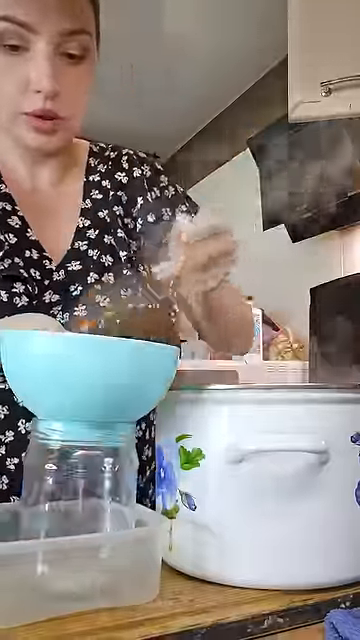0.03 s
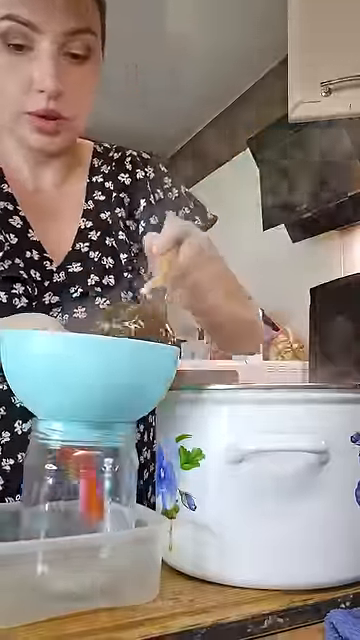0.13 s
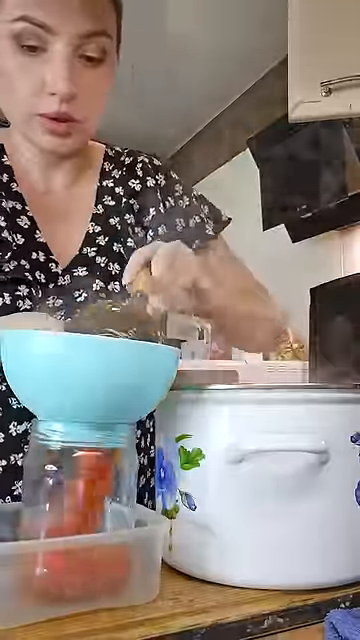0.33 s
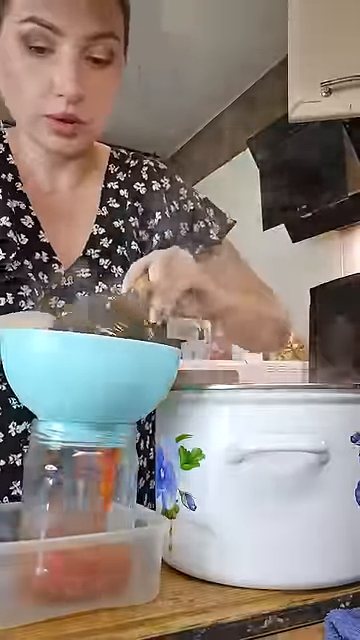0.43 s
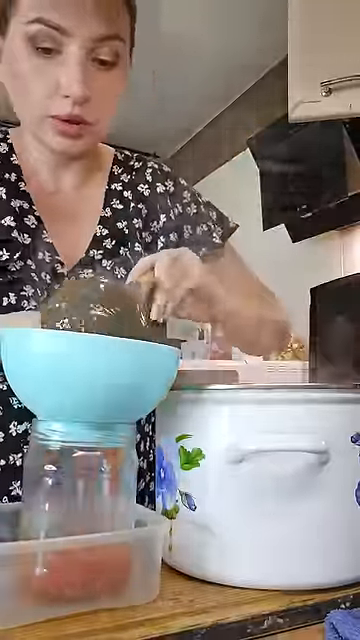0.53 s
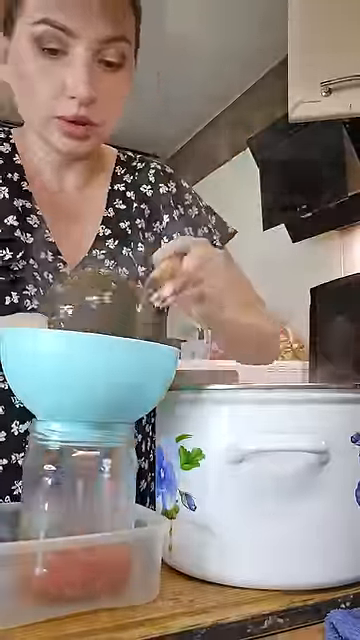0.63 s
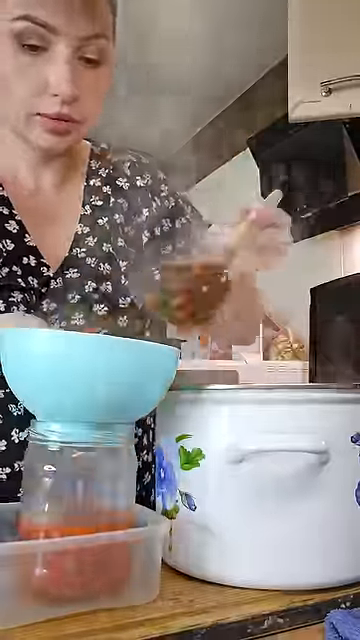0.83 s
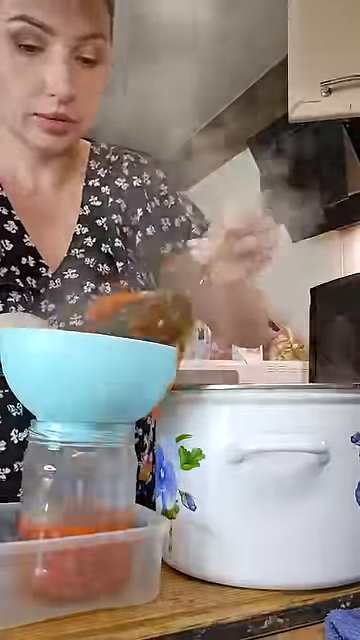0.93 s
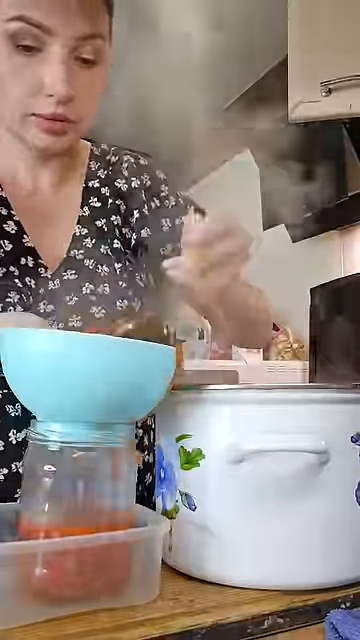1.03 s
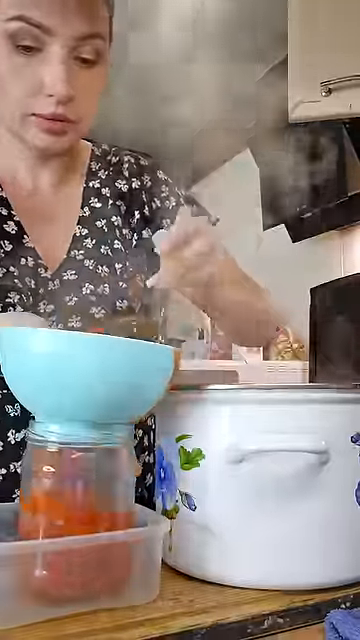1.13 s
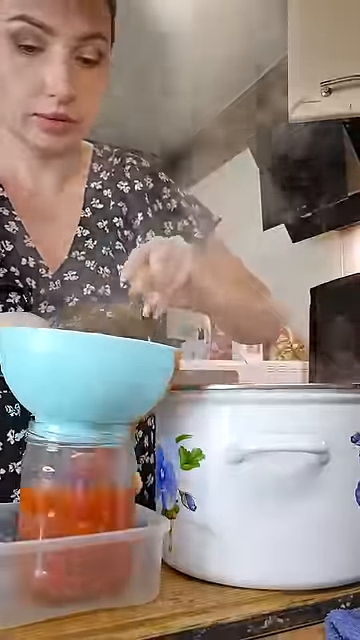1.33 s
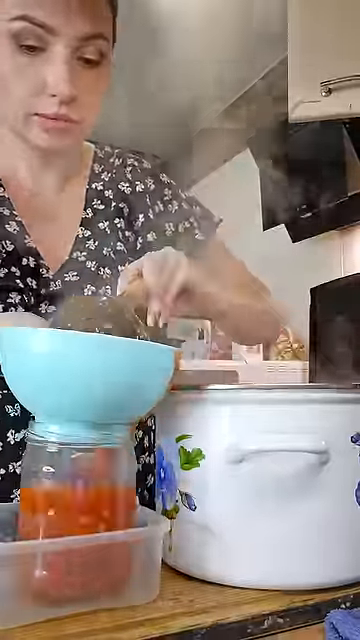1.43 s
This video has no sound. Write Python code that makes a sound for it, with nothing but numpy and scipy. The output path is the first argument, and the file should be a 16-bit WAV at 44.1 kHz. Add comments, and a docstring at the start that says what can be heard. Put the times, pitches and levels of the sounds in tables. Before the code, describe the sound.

Thick sauce ladled through a plastic funnel into a glass jar: bright ticks and funnel knocks, a hollow plop, small drips, then a denser burst of knocks and plops, close up in a small kitchen with a low drone.

```python
"""An appliance drone of filtered noise lies under a small kitchen all the way; grains and a wet band trickle.
First, ladle ticks and funnel knocks (rattle-driven modes) lead to a plop (a swelling, rising sine) in the jar.
Two drips (clear sines) follow and the blows thin out; a denser burst of blows and plops comes past 1.1 s.
Ticks and drips close it. Thick sauce is being ladled through a plastic funnel into a glass jar."""
import sys
import numpy as np
from scipy import signal
from scipy.io import wavfile

SR = 44100
rng = np.random.default_rng(int(sys.argv[2]) if len(sys.argv) > 2 else 0)


def int16_out(signal):
    """Quantize to a 16-bit WAV file."""
    q = np.round(np.clip(np.atleast_2d(signal).T, -1, 1) * 32767)
    wavfile.write(sys.argv[1], SR, q.astype(np.int16))


def volts(x):
    """Linear amplitude factor 10**(x/20) for a level x in dB, scalar or array-like."""
    e = np.asarray(x, float) / 20
    return 10 ** e


N = 66150


def rms_one(x):
    """Scale to rms 1."""
    return x / np.sqrt(np.mean(x ** 2) + 1e-20)


def peak_one(x):
    """Scale to peak 1."""
    return x / np.abs(x).max()


def in_time(rows):
    """Join curve rows by straight lines, one value per sample."""
    s, *columns = np.transpose(rows)
    return [np.interp(np.arange(N) / SR, s, c) for c in columns]


def at_hz(points, hz):
    """Read a curve over a log frequency axis."""
    f, value = np.transpose(points)
    return np.interp(np.log(hz), np.log(f), value)


def drift(rate_hz):
    """Slow random curve of rms 1: noise through two equal low-pass poles."""
    step = 40  # samples per drift point
    r = np.exp(-2 * np.pi * step * rate_hz / SR)
    noise = rng.standard_normal(N // step + 2002)
    slow = signal.lfilter([1], [1, -2 * r, r * r], noise)[2000:]
    return np.interp(np.arange(N) / step, np.arange(len(slow)), rms_one(slow))


def ring(x, hz, t60_s):
    """Two-pole mode: a unit click sets a decaying sine of height 1 ringing."""
    r, w = volts(-60 / (t60_s * SR)), 2 * np.pi * hz / SR
    return signal.lfilter([0, np.sin(w)], [1, -2 * r * np.cos(w), r * r], x + 1e-18)


def resonance(x, hz, width_hz):
    """Band-pass with gain 1 on top."""
    r = np.exp(-np.pi * width_hz / SR)
    poles = [1, -2 * r * np.cos(2 * np.pi * hz / SR), r * r]
    return signal.lfilter((1 - r * r) / 2 * np.array([1, 0, -1]), poles, x)


def butter(x, order, hz, kind="low"):
    """Butterworth filter."""
    return signal.sosfilt(signal.butter(order, hz, kind, fs=SR, output="sos"), x)


def panned(left_right_db):
    """Left and right gains."""
    return volts(np.array([[left_right_db / 2], [-left_right_db / 2]]))


def bands(spectrum, sources, patchy_db, likeness):
    """Third-octave bank fed in turn by two mid/side pairs, each band wandering in level; rms 1."""
    out, edges_hz = 0, 25 * 2 ** np.arange(0, 9.5, 1 / 3)
    for k, (low, high) in enumerate(zip(edges_hz, edges_hz[1:])):
        hz = np.sqrt(low * high)
        if hz < spectrum[0][0]:
            continue
        mid, side = butter(sources[k % 2], 2, [low, high], "band")
        alike = np.clip(at_hz(likeness, hz), -1, 1)
        stereo = np.sqrt(1 + alike) * mid + np.sqrt(1 - alike) * side * [[1], [-1]]
        out = out + volts(at_hz(spectrum, hz) + patchy_db * drift(14)) * stereo
    return rms_one(out)


def kitchen(x):
    """Room echo: eight feedback delays a side, duller on every round."""
    t60_s, wall_cut_hz = 0.26, 5950
    out, dull = np.zeros((2, N)), np.exp(-2 * np.pi * wall_cut_hz / SR)
    for k, lag in enumerate((rng.uniform(.008, .03, 16) * SR).astype(int)):
        loop, gain, state = x.copy(), volts(-60 * lag / SR / t60_s), [0.]
        for i in range(lag, N, lag):
            back, state = signal.lfilter([gain * (1 - dull)], [1, -dull], loop[i - lag:i], zi=state)
            loop[i:i + lag] += back[:N - i]
        out[k % 2] += (loop - x) * (-1) ** (k // 2)
    return out


def drone():
    """Appliance rumble: shaped noise with two resonant bands."""
    # rumble spectrum: f/Hz, density/dB (relative)
    rumble_spectrum = [(25, -22), (55, 4.5), (92, 3), (160, 5.5), (210, 2.5), (335, -1), (463, 0.5),
                       (600, 2.5), (760, -11), (900, -16.5), (1050, -32), (1400, -16), (2000, -26),
                       (2760, -24), (4140, -28.5), (6300, -69), (7500, -61), (16000, -63.5)]
    # rumble course: t/s, level/dB
    rumble_course = [(0, -31), (.25, -31), (.362, -33.5), (.496, -35.5), (.752, -36.5), (.948, -33.5),
                     (1.12, -32.5), (1.5, -35.5)]
    # resonant bands: f/Hz, width/Hz, level/dB at the mean of the course
    hum_bands = [(155.36, 4.2, -38.5), (273.5, 6.1, -45.5)]
    # left-right likeness: f/Hz, correlation
    ear_likeness = [(60, 0.97), (180, 1), (550, 0.94), (1650, -0.86), (4970, 0.54), (15000, 0.0)]
    level_db, = in_time(rumble_course)
    hums = 0
    for hz, width_hz, db in hum_bands:
        hums = hums + volts(db) * rms_one(resonance(rng.standard_normal(N), hz, width_hz))
    noise = bands(rumble_spectrum, rng.standard_normal((2, 2, N)), patchy_db=.6, likeness=ear_likeness)
    noise = butter(noise, 12, 6200)
    return volts(level_db) * noise + volts(level_db - level_db.mean()) * hums


def droplets():
    """Small drops land in clumps and ring briefly at 16 pitches over one and a half octaves; rms 1."""
    median_per_s, clump_db, ring_cycles = 450, 5, 20
    chance = median_per_s * volts(clump_db * drift(35)) / SR
    size = volts(3.5 * np.minimum(rng.exponential(1, (2, N)), 4))
    clicks = (rng.random((2, N)) < chance) * size
    dealt = rng.integers(0, 16, (2, N))
    out = 0
    for k, hz in enumerate(np.geomspace(2300, 6400, 16)):
        out = out + ring(clicks * (dealt == k), hz, ring_cycles / hz)
    return rms_one(out)


def trickle():
    """Running sauce: random grains, ringing droplets and a wet noise band wandering in pitch."""
    # trickle course: t/s, fine patter level/dB, wet sliding level/dB
    course = [(0, -61, -41.5), (.154, -62, -45.5), (.24, -46.5, -45.5), (.3, -47.5, -38.5),
              (.408, -51.5, -47), (.476, -58.5, -56), (.65, -59, -61), (.76, -66, -56.5),
              (1.044, -72.5, -57.5), (1.132, -54, -49), (1.2, -34, -38), (1.27, -34.5, -60),
              (1.33, -64.5, -51), (1.5, -52, -69)]
    # patter spectrum: f/Hz, density/dB (relative)
    patter_spectrum = [(2300, -28), (3400, 7), (4200, 2), (5500, 7.5), (6600, -28)]
    grains_per_s, drops_vs_patter_db = 1900, 2
    slide_hz, slide_wander_hz, slide_width_hz = 1995, 30, 170
    patter_db, slide_db = in_time(course)

    hit = rng.random((2, 2, N)) < grains_per_s / SR
    size = volts(2.8 * np.minimum(rng.exponential(1, (2, 2, N)), 3))
    grains = hit * size * rng.choice([-1, 1], (2, 2, N))
    patter = bands(patter_spectrum, grains, patchy_db=2, likeness=[(1000, .4), (10000, .2)])
    fine = volts(patter_db) * patter + volts(patter_db + drops_vs_patter_db) * droplets()

    turns = np.cumsum(slide_hz + slide_wander_hz * drift(9)) / SR
    # low-passed noise on two quadrature carriers makes a moving band
    a, b = butter(rng.standard_normal((2, N)), 2, slide_width_hz / 2)
    slide = a * np.cos(2 * np.pi * turns) + b * np.sin(2 * np.pi * turns)
    return butter(fine, 12, 7200) + volts(slide_db + 0.3 * drift(37)) * rms_one(slide)


def drips():
    """Each drip in the jar is a short clear tone that swells and fades."""
    # single drips: t/s, level/dB, f/Hz, length/s
    drip_events = [(.508, -33, 483.6, 0.049), (0.548, -30, 607, 0.04), (1.417, -47, 1360, 0.018),
                   (1.42, -36.5, 3080, 0.012), (1.429, -48.5, 1108, 0.06), (1.432, -46, 1550, 0.051),
                   (1.487, -37.5, 3230, 0.0095)]
    out = np.zeros(N + SR)
    for s, db, hz, length_s in drip_events:
        t = np.arange(int(length_s * SR)) / SR
        swell = np.sin(np.pi * np.sqrt(t / length_s))
        out[int(s * SR):][:len(t)] += volts(db) * swell * np.sin(2 * np.pi * hz * t)
    return out[:N]


def blows(events, modes, crack_db, detune):
    """A short swelling rattle drives the modes near each contact's centre, plus a wide crack with a tail."""
    crack_s, tail_db, tail_s = 0.003, -12, 0.025
    out, t = np.zeros((2, N + SR)), np.arange(6000) / SR
    for s, db, centre_hz, contact_s, width_oct, *pan_db in events:
        noise = rng.standard_normal((4, len(t)))
        shift = 1 + detune * rng.standard_normal(len(modes))
        rattle = noise[0] * t * np.exp(-t / max(contact_s, 2e-4))
        wave = 0
        for (hz, mode_db, t60_s), k in zip(modes, shift):
            off_centre_db = min(6 * (np.log2(hz / centre_hz) / width_oct) ** 2, 24)
            wave = wave + volts(mode_db - off_centre_db) * peak_one(ring(rattle, hz * k, t60_s))
        decay = np.exp(-t / crack_s) + volts(tail_db) * np.exp(-t / tail_s)
        # one noise common to both sides, a stronger one for each
        crack = (noise[1] + 5.2 * noise[2:]) * (1 - np.exp(-t / contact_s)) * decay
        both = panned(sum(pan_db)) * peak_one(wave) + volts(crack_db) * crack
        i = int(s * SR)
        out[:, i:i + len(t)] += volts(db) * butter(both, 3, 0.64 * centre_hz, "high")
    return out[:, :N]


def knocks():
    """Duller knocks on the funnel: low modes, faint crack, each with its own pan."""
    # knocks: t/s, level/dB, centre f/Hz, contact/s, width/octave, left-right/dB
    knock_events = [(.183, -26, 1560, 0.0011, 0.076, -3), (.2714, -9.5, 2104, 0.0016, 0.15, 2),
                    (.285, -30, 1210, 0.0035, 0.078, 17), (.3656, -11, 2150, 0.00086, 0.1, -5),
                    (.375, -25, 1210, 0.002, 0.062, 9), (.4354, -32, 1445, 0.0029, .2, -9),
                    (.487, -37, 2550, 0.00096, 0.12, -13), (.5536, -31, 1560, 0.00051, .1, -2),
                    (1.1318, -26, 1850, 0.00097, 0.16, 1), (1.1717, -28, 1850, 0.0033, 0.22, -22),
                    (1.1972, -9.5, 1850, 0.0012, 0.063, -11), (1.2, -13.5, 2390, 0.0033, .15, 5.5),
                    (1.22, -23, 2980, 0.0073, 0.077, 1), (1.2396, -17, 2730, 0.0017, 0.12, 2),
                    (1.253, -23, 2430, 0.00055, 0.54, -11.5), (1.292, -26.5, 2690, 0.0021, 0.081, -5),
                    (1.3209, -17.5, 2070, 0.00046, 0.091, -6), (1.321, -27.5, 1416, 0.00072, 0.054, 23)]
    # funnel modes: f/Hz, level/dB, t60/s
    knock_modes = [(1013, 18.5, 0.07), (1210, 18, 0.08), (1330, 24, 0.016), (1560, 0.5, 0.14),
                   (1850, 2, 0.045), (2048, 2, 0.045), (2150, -10.5, 0.097), (2390, 2.5, 0.038),
                   (2690, 4, 0.056), (3070, 13, 0.079)]
    return blows(knock_events, knock_modes, crack_db=-52, detune=.0075)


def ticks():
    """Bright splats and ticks: high modes, detuned on every wet contact, stronger on the right."""
    # ticks: t/s, level/dB, centre f/Hz, contact/s, width/octave
    tick_events = [(0.0946, -38.5, 4460, 0.0024, 0.092), (0.169, -34, 5000, 0.0052, 0.095),
                   (0.174, -32.5, 6000, 0.0037, 0.077), (0.2267, -18.5, 4270, 0.0027, 0.093),
                   (0.2314, -17.5, 3800, 0.0038, 0.3), (0.2425, -26, 3580, 0.0017, 0.12),
                   (0.2678, -30.5, 5650, 0.0037, 0.15), (0.2804, -27.5, 5500, 0.0045, 0.078),
                   (0.3104, -19, 4990, 0.0033, 0.3), (0.3234, -5, 5640, 0.0036, 0.067),
                   (0.3255, -12.5, 4130, 0.0031, 0.051), (0.3631, -16, 4330, 0.0018, 0.22),
                   (0.4021, -28.5, 5930, 0.0015, 0.09), (0.4334, -29, 3680, 0.004, 0.98),
                   (0.4827, -30, 5600, 0.0013, 0.68), (0.5512, -13, 6360, 0.003, 0.98),
                   (0.6581, -22.5, 5880, 0.0027, 0.19), (0.6938, -38.5, 4240, 0.00072, 0.37),
                   (0.7924, -47, 5600, 0.0026, 0.34), (1.053, -45, 5800, 0.004, 0.15),
                   (1.0902, -22.5, 4720, 0.0014, 0.14), (1.1385, -22.5, 5160, 0.0018, 0.24),
                   (1.1534, -20.5, 5500, 0.00066, 0.32), (1.1713, -13, 6200, 0.0014, 0.68),
                   (1.18, -12, 5650, 0.0037, 0.65), (1.1956, -13, 6500, 0.0019, 0.18),
                   (1.2223, -33, 6000, 0.0035, 0.08), (1.2452, -18.5, 5840, 0.0019, 0.083),
                   (1.253, -31, 5370, 0.003, 0.098), (1.293, -18, 5700, 0.00085, 0.83),
                   (1.3195, -10, 5970, 0.0019, 0.35), (1.3311, -24, 5960, 0.00096, 0.21),
                   (1.3603, -32, 5500, 0.00079, 0.24), (1.3954, -30, 5850, 0.0043, 0.044),
                   (1.421, -34, 5800, 0.0022, 0.12), (1.4671, -45, 4780, 0.002, 0.9),
                   (1.488, -26, 5200, 0.0016, 0.067)]
    # bright modes: f/Hz, level/dB, t60/s
    tick_modes = [(3100, -3, .025), (3550, -3, .02), (3900, -2, .025), (4300, -1, .03), (4720, -1, .015),
                  (5150, -1, .015), (5400, 0, .02), (5730, -1, .018), (6140, -1, .02), (6600, -2, .012),
                  (7150, -5, .012), (8100, -10, .01), (9400, -12, .01), (11500, -14, .015)]
    return panned(-6.5) * blows(tick_events, tick_modes, crack_db=-26, detune=.015)


def plops():
    """An air pocket trapped by a lump rings a few cycles, rising; weaker, higher swells follow."""
    # plops: t/s, level/dB, f/Hz, length/s, right port lag/s
    plop_events = [(0.28, -22.5, 1210, 0.0077, 0.00025), (0.281, -22, 517, 0.018, 0.000076),
                   (.365, -15, 1288, 0.0041, 0.00023), (.366, -19, 570, 0.0076, 0.000057),
                   (0.4325, 3, 530, 0.012, 0.00009), (1.1767, 3.5, 576, 0.01, 0.00018),
                   (1.183, 0, 820, 0.0075, 0.00042), (1.173, -26, 314.6, 0.019, 0.00012),
                   (1.251, 2.5, 826, 0.00786, 0.00038), (1.2511, -9.5, 944, 0.012, 0.00024),
                   (1.2511, -13.5, 468, 0.012, 0.000049), (1.252, -9, 1330, 0.0083, 0.00025)]
    # later swells: delay/s, level/dB, length ratio
    later_swells = [(.009, -9, 1.1), (.017, -8, 1.2), (.026, -13.5, 1.4), (.040, -16.5, 1.4),
                    (.047, -25, 1.2), (.062, -34, 1.5), (.085, -37, 2.5)]
    rise_share, climb_per_s = 0.018, 1.1  # pitch rise within a swell; from swell to swell
    fade_db_per_oct_s, jar_hz = 591, 530  # higher pops die away faster
    out = np.zeros((2, N + SR))
    for s, db, first_hz, length_s, lag_s in plop_events:
        fade_db_per_s = fade_db_per_oct_s * np.log2(first_hz / jar_hz)
        for delay_s, swell_db, smear in [(0.00044, 0.011, 0.96)] + later_swells:
            span_s, hz = length_s * smear, first_hz * (1 + climb_per_s * delay_s)
            t = np.arange(int((span_s + .002) * SR)) / SR - [[0], [max(lag_s, 0)]]
            t = np.clip(t, 0, span_s)
            swell = np.abs(np.sin(np.pi * t / span_s)) ** (3 / 2)
            cycles = hz * t * (1 - rise_share / 2 + rise_share * t / (2 * span_s))
            i = int((s + delay_s) * SR)
            gain = volts(db + swell_db - delay_s * fade_db_per_s)
            out[:, i:i + t.shape[1]] += gain * swell * np.sin(2 * np.pi * cycles)
    return out[:, :N]


def scene():
    """Sum the sources and the room; sounds at the funnel reach the right port a little later."""
    right_lag_s, hits_wet_db, plops_wet_db = 0.0004442, -14, -18.5
    low = plops()
    hits = ticks() + knocks()
    late = np.interp(np.arange(N) - right_lag_s * SR, np.arange(N), hits[1])
    wet = kitchen(volts(hits_wet_db) * hits.mean(axis=0) + volts(plops_wet_db) * low.mean(axis=0))
    return low + np.array([hits[0], late]) + wet + trickle() + drips() + drone()


def limiter(x):
    """Loud moments pull the gain down; it recovers at a steady rate in dB."""
    threshold_db, share, release_db_per_s, attack_s = -12.5, 0.45, 103, 0.0063
    over_db = np.maximum(20 * np.log10(np.abs(x).max(axis=0) + 1e-9) - threshold_db, 0)
    ramp_db = release_db_per_s * np.arange(N) / SR
    held_db = np.maximum.accumulate(share * over_db + ramp_db) - ramp_db
    r = np.exp(-1 / (attack_s * SR))
    return x * volts(-signal.lfilter([1 - r], [1, -r], held_db))


def low_pass(x):
    """Removes everything above the highest recorded frequency."""
    return signal.sosfilt(signal.butter(12, 16730, fs=SR, output="sos"), x)


def record(dry):
    """Each microphone port has a resonance, both a dip; gain is limited, the top is cut, peaks clip."""
    ports = [(8600, 2500, 7), (5600, 2200, 8)]  # left, right: f/Hz, width/Hz, level/dB
    dip_hz, dip_width_hz, dip_db = 10280, 500, -19
    x = np.array([v + (volts(db) - 1) * resonance(v, hz, width_hz)
                  for v, (hz, width_hz, db) in zip(dry, ports)])
    x = x + (volts(dip_db) - 1) * resonance(x, dip_hz, dip_width_hz)
    x = signal.sosfilt(signal.cheby2(10, 30, 16300, fs=SR, output="sos"), limiter(x))
    return low_pass(np.clip(x, -0.94, 0.94))


dry = scene()
out = record(dry)
int16_out(out)
```